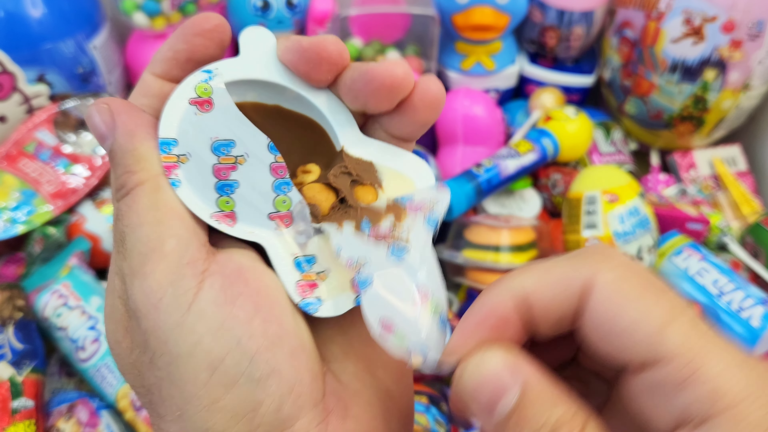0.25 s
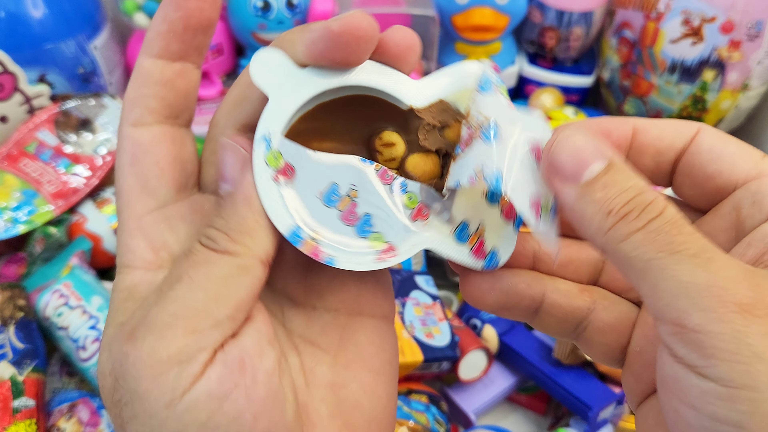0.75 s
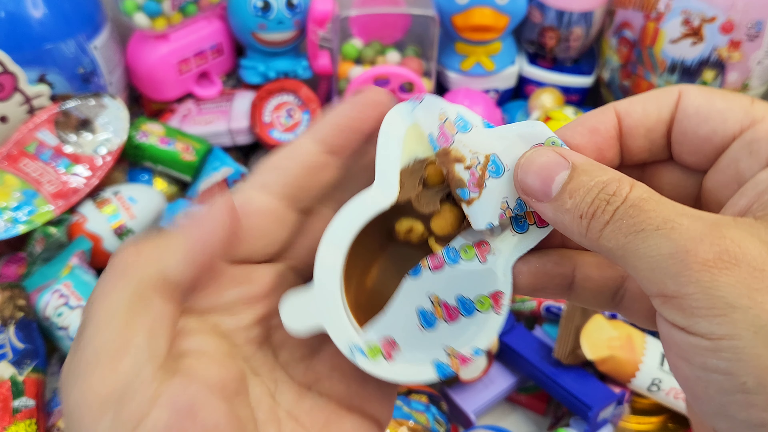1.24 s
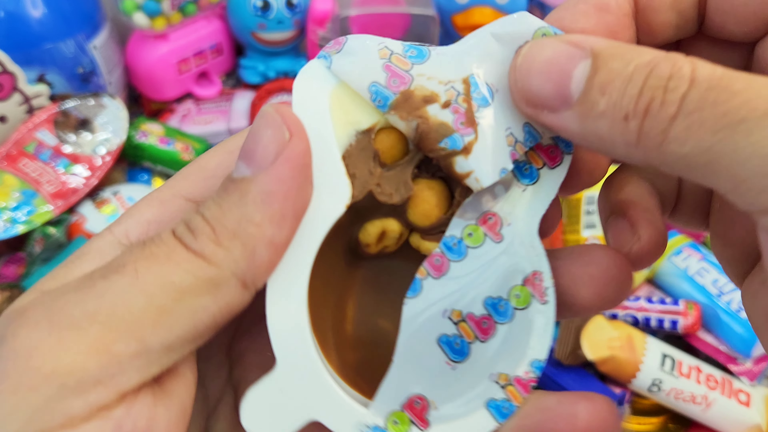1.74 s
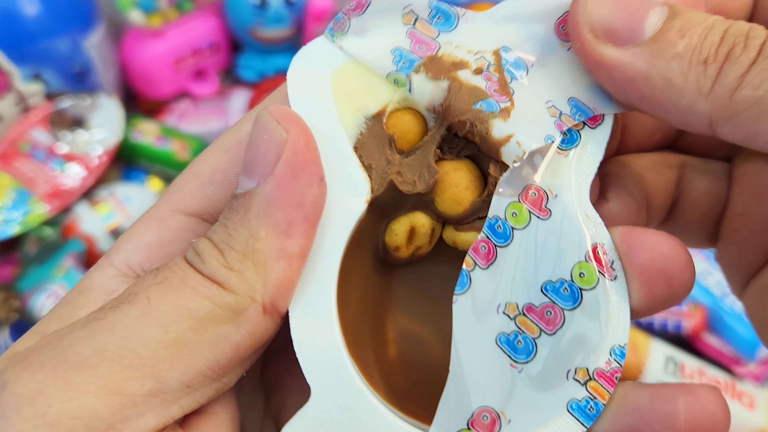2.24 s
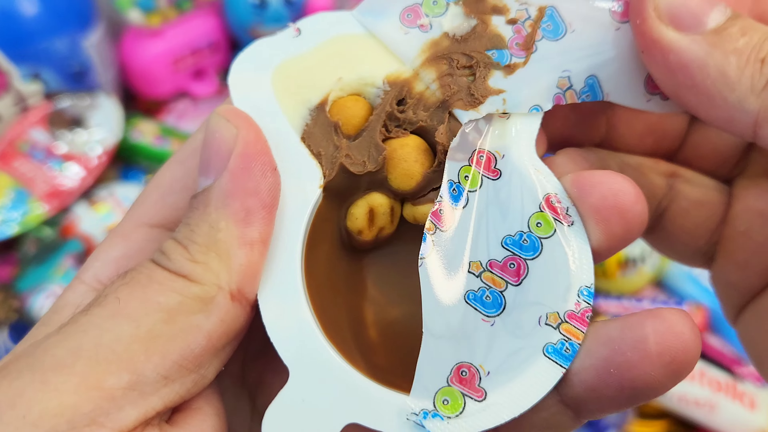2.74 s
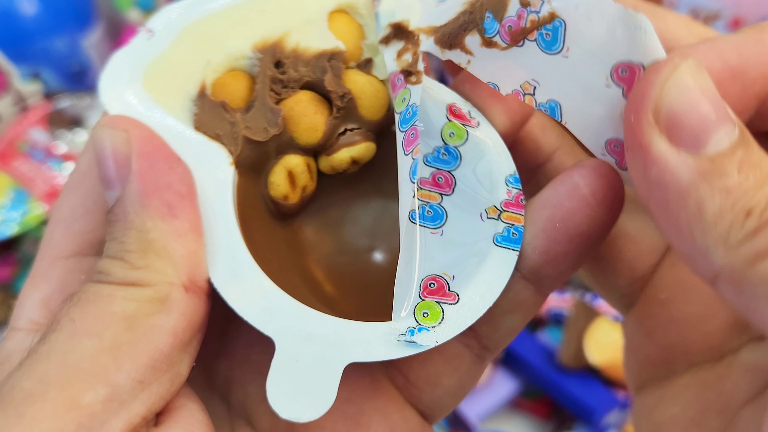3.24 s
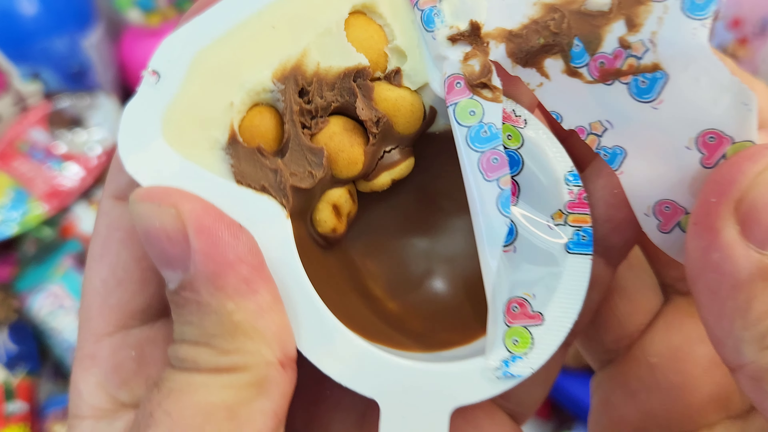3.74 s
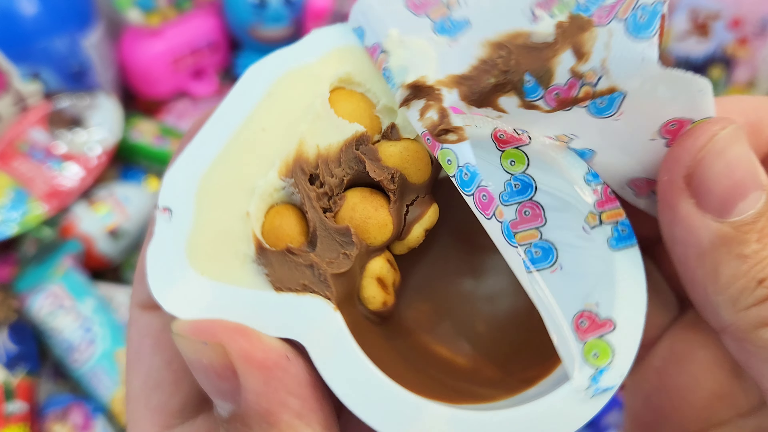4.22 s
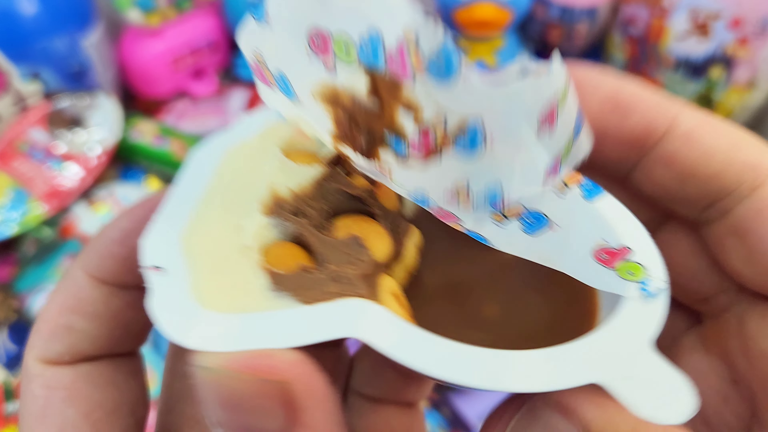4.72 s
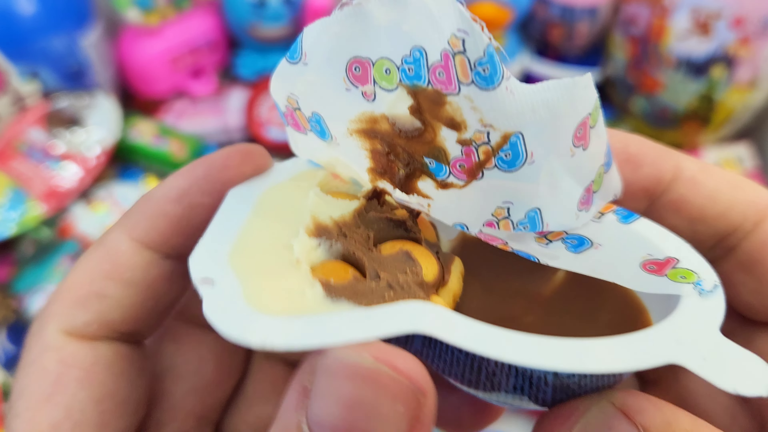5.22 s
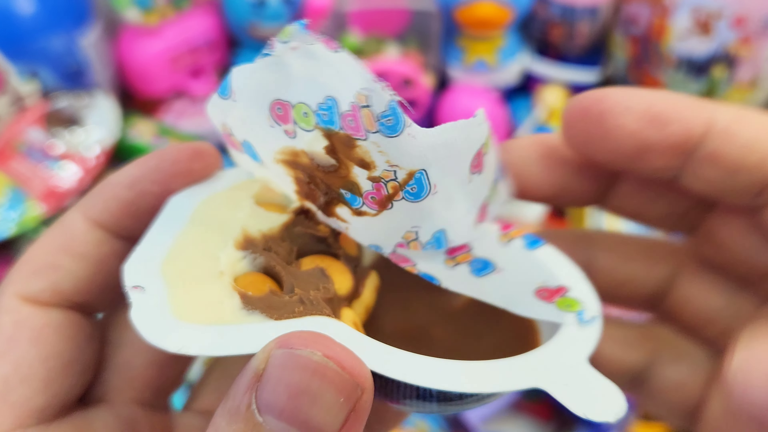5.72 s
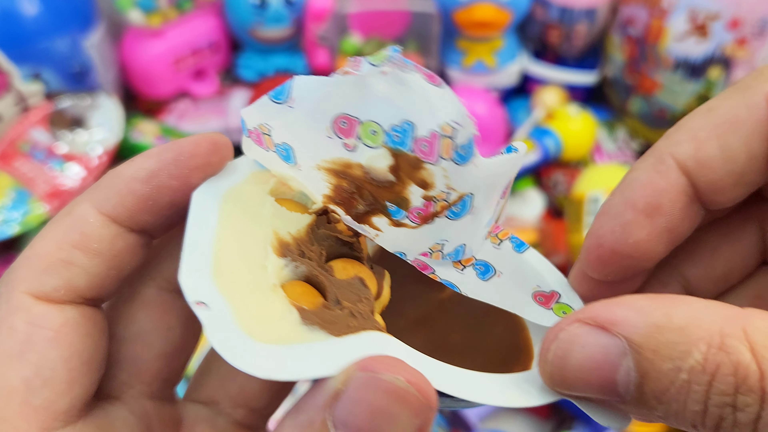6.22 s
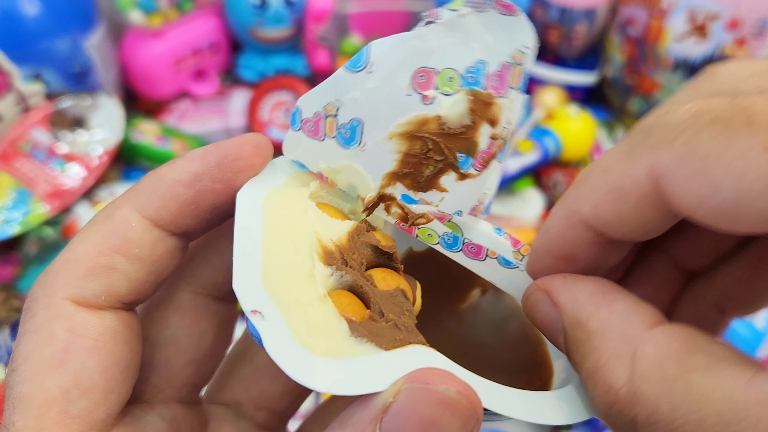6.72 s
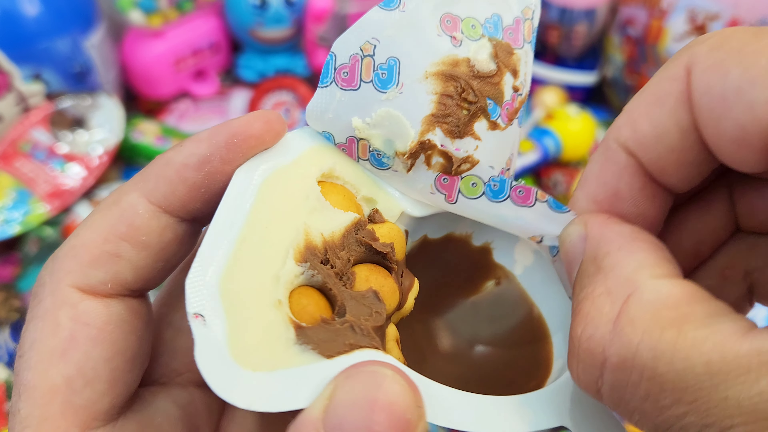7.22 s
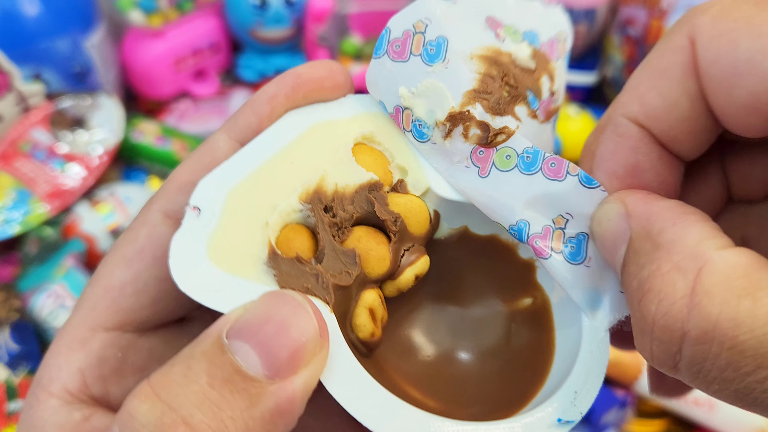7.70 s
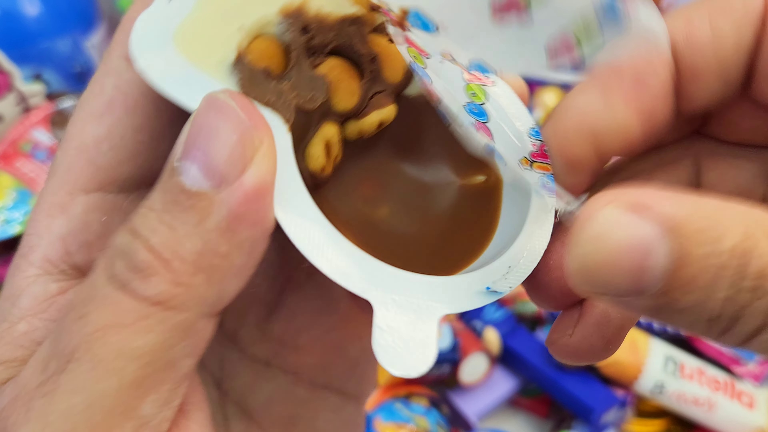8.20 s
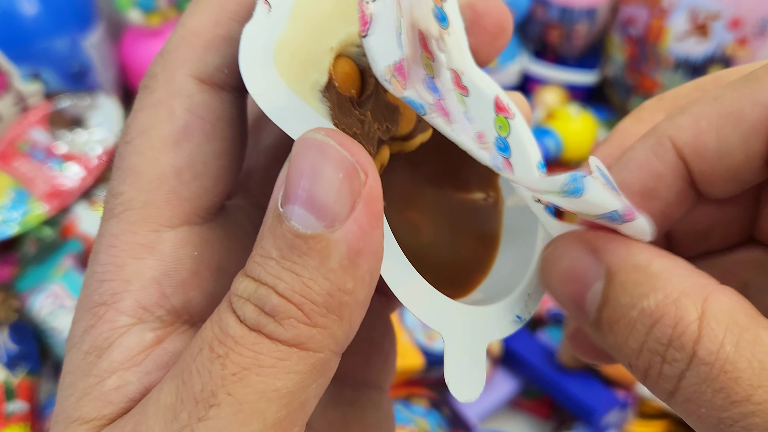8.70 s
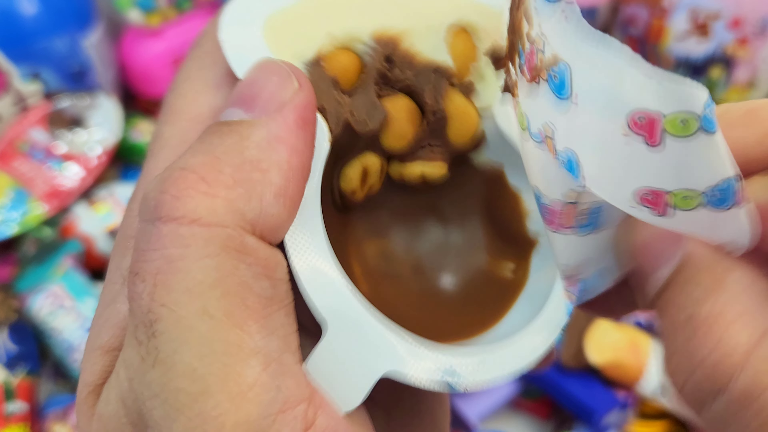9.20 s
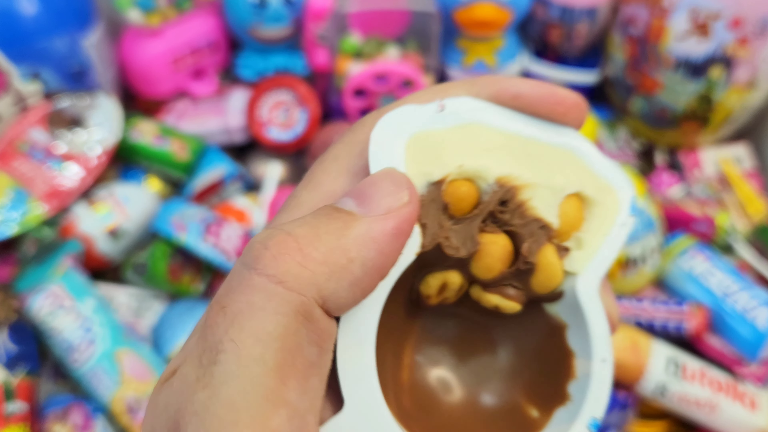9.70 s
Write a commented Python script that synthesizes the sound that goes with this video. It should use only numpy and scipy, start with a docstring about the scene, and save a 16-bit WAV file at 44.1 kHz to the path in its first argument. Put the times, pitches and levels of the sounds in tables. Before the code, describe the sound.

Bright foil crackles and pops as a lid is torn from a little plastic cup, with quiet pauses, faint rustling and distant soft thuds.

```python
"""Close stereo pair in a small hard room: hands peel and crinkle a foil lid off a small plastic cup, 9.95 s.
It opens on a tight run of snaps: noise cracks, sagging sine rings of the freed patch and damped cup thumps.
Hiss, rumble, far thuds on two low resonances and a hum, all shaped noise, lie beneath; creases rustle.
From 0.2 s come a few finger taps (falling sines), from 0.6 s short slides of skin on foil (noise).
The peeling thickens at 2.1 to 3.1 s, thins out, then is strong near 7.4 s and 9.4 s before it dwindles."""
import sys
import numpy as np
from scipy import signal
from scipy.fft import rfft, irfft
from scipy.io import wavfile
from scipy.ndimage import uniform_filter1d

SR = 44100
rng = np.random.default_rng(int(sys.argv[2]) if len(sys.argv) > 2 else 0)


def output_pcm(signal):
    """Save a mono or channel-first signal as 16-bit PCM at the path in sys.argv[1].

    Samples are clipped to [-1, 1] before scaling.
    """
    pcm = np.clip(np.atleast_2d(signal).T, -1, 1) * 32767
    wavfile.write(sys.argv[1], SR, np.round(pcm).astype(np.int16))


N = 438794
TIME_S = np.arange(N) / SR

# Room tone, spectrum: pitch_hz, relative level_db
HISS_SPECTRUM = [(15, -51.5), (25, -13.5), (64, -11), (145, -15), (277, -21.5), (911, -30), (3520, -37.5),
                 (6920, -49), (16000, -58.5)]
HISS_DB = -66
# Likeness of the hiss at the two microphones: pitch_hz, likeness (0 to 1)
HISS_LIKENESS = [(60, 0.65), (400, 0.31), (3000, 0.57)]

# The two lowest room resonances: pitch_hz, width_hz
ROOM_MODES = [(72, 35), (142, 17)]
# Far thuds: start_s, lower_resonance_db, upper_resonance_db, knock_db
THUDS = [(.23, -52, -62, -77), (0.878, -57, -57, -56), (1.1, -59, -65, -79), (1.97, -59, -50, -55.5),
         (2.31, -56.5, -64.5, -70.5), (2.61, -47, -51.5, -37.5), (2.789, -45, -50, -63),
         (2.93, -58.5, -49, -61.5), (3.83, -62, -76.5, -88), (3.96, -70, -76, -93), (4.339, -59, -68, -76),
         (4.544, -57, -42.5, -60), (4.859, -78, -87, -87), (5.138, -63, -51.5, -73),
         (5.359, -67.5, -56, -77.5), (5.758, -41, -38.5, -49.5), (6.019, -45.5, -46.5, -78.5),
         (6.3, -64, -53, -68.5), (6.568, -48, -48, -60.5), (6.798, -49.5, -40, -50.5),
         (7.3, -59.5, -57.5, -55), (7.47, -65, -68, -67), (8.05, -69, -56, -65.5),
         (8.33, -68.5, -57.5, -62.5), (9.19, -53, -71, -79), (9.549, -51.5, -49.5, -35.5)]
# Rumble between the thuds, level_db of: lower resonance, upper resonance, knock
IDLE_RUMBLE_DB = [-64, -68.5, -78.5]
THUD_RISE_S, THUD_FALL_DB_PER_S = 0.045, 113
KNOCK_LEAD_S, KNOCK_FALL_DB_PER_S = 0.025, 198.5  # the knock precedes the room's ring and dies sooner

# A faint far hum that comes and goes: time_s, level_db
HUM_LEVEL = [(0, -85), (4.7, -83.5), (5.3, -73.5), (5.9, -82.5), (7.3, -78), (8.2, -65.5), (8.9, -81.5),
             (9.95, -76)]
HUM_HZ, HUM_WIDTH_HZ = 414, 30

# Buckles of the lid: time_s, nominal patch_pitch_hz, ring_db, crack_centre_hz, crack_db, thump_db
SNAPS = [(0.0059, 3330, -29, 8500, -7, -42.5), (0.0249, 2200, -21.5, 10280, -10, -42.5),
         (0.033, 2038, -8.5, 4010, -10.0, -42), (0.0468, 1830, -19.5, 9640, -2.5, -37.5),
         (0.0614, 1930, -34, 10160, -26, -47.5), (0.08, 3540, -21, 9710, -8, -39.5),
         (0.0924, 3120, -19, 9630, -18.5, -48.5), (0.0991, 2340, -15, 4700, -17, -34),
         (0.229, 856, -34.5, 4050, -43, -35), (0.3823, 3454, -31.5, 4040, -37.5, -68.0),
         (0.4084, 1730, -29.5, 4630, -33, -47), (0.4167, 1880.0, -47.0, 4400, -39, -67.0),
         (0.5572, 2070, -29.5, 10400, -30, -74), (0.5964, 2350, -39, 10300, -34, -64),
         (0.672, 2440, -44.0, 3970, -41, -73), (0.6806, 3650, -42, 3980, -50, -73),
         (0.7325, 3560, -31, 4500, -27.5, -67.0), (0.7424, 3440, -52, 4700.0, -41, -68.0),
         (0.826, 3356, -39, 4800.0, -45, -67.0), (1.0716, 3100, -37, 5000.0, -54.5, -66.0),
         (1.092, 2400.0, -55, 4950, -50.0, -66.0), (1.162, 2420.0, -39.5, 9460, -48, -62),
         (1.6248, 3093, -39, 5030, -39, -70.0), (1.656, 1400.0, -45, 9200, -26.0, -66),
         (1.6857, 960, -46.5, 10200.0, -24.0, -51.0), (1.788, 1526, -28, 5000.0, -21.5, -33.5),
         (1.88, 1500, -40.5, 5450, -30, -54.5), (1.9825, 760.0, -63.5, 10020, -39.0, -55),
         (2.042, 1120.0, -70.5, 9850, -50.5, -59.5), (2.1032, 2840, -18, 11840, -14.5, -34),
         (2.158, 2790, -35.5, 5150, -24, -59.5), (2.227, 2157, -18, 5190, -11.5, -35),
         (2.2939, 3700, -26.0, 4920, -13.0, -37.5), (2.3067, 736, -41.5, 11610, -17.5, -40.5),
         (2.3167, 847, -12.5, 11900, -1.5, -19), (2.3356, 1126, -23, 8800, -10, -24),
         (2.3461, 1080.0, -25, 5180, -15, -28), (2.3768, 930, -33.5, 9700, -18.0, -46.5),
         (2.533, 3110, -40.5, 10470, -25, -62.5), (2.5838, 3270, -33, 10170, -21, -62.0),
         (2.596, 3750, -39, 10460, -28, -42), (2.616, 685, -21.5, 9490, -16, -17.5),
         (2.625, 3300, -15, 9670, -8, -22), (2.6289, 2086, -12, 9660, -19, -23.5),
         (2.6334, 3920, -3.5, 9600.0, -13, -22), (2.6373, 1126, -20.5, 9610, -4, -22),
         (2.6422, 970, -17.5, 4630, -9, -26), (2.6568, 1545, -22.5, 4260, -15, -38),
         (2.699, 1530, -25.5, 9970, -17, -54), (2.757, 3743, -10.5, 10250, -9.0, -47.0),
         (2.7891, 3500, -27, 5850, -14, -38.5), (2.8, 3800, -18.5, 4200.0, -25.5, -33),
         (2.8059, 1190, -27.0, 7620, -20.5, -40.5), (2.8195, 2740, -21.5, 11660, -20.0, -52),
         (2.827, 813, -30.5, 7690, -25, -46.5), (2.838, 3480, -21.5, 4344, -29, -62),
         (2.862, 3170.0, -23.5, 4300.0, -28, -57.5), (2.8786, 3180, -32, 4370, -25.5, -47.5),
         (2.8868, 3330, -29, 5080, -16, -42), (2.8913, 3480, -25.5, 5100.0, -21, -44.5),
         (2.9202, 1540, -35.5, 12950, -17.5, -39.5), (2.933, 3170, -36.5, 11200, -23.5, -33.5),
         (2.9573, 3420, -35.5, 12150, -28.5, -39), (2.9664, 3600, -17, 11900, -14.5, -25.5),
         (2.986, 870, -23.5, 5360, -24, -22.5), (3.0037, 961, -16, 11240, -15.0, -24.5),
         (3.0177, 987, -12.0, 11660, -11.5, -31), (3.026, 2350, -6, 11000.0, -10, -27.5),
         (3.0351, 1056, -11, 11000.0, -6.5, -35.5), (3.053, 1030, -13, 11400, -7, -33.0),
         (3.064, 970, -33, 11200, -12, -44), (3.1992, 2100, -25, 4600.0, -39.0, -50),
         (3.2043, 865, -31, 4000.0, -28.0, -38), (3.2097, 1970, -26.0, 11100.0, -31, -40),
         (3.2187, 2540, -20, 4000.0, -32, -44), (3.231, 3020, -18.5, 11000, -19, -49),
         (3.2559, 2530, -30, 4200, -31, -41), (3.2815, 2474, -28.5, 8200.0, -26.5, -52),
         (3.4734, 3910, -28, 4010, -25.5, -35), (3.9459, 2780, -51, 5200.0, -44.5, -65.5),
         (3.9756, 980.0, -27.5, 4020, -27.5, -40), (4.0635, 2260, -40, 4400.0, -48, -39),
         (4.1622, 2422, -16, 4000.0, -44, -38), (4.1947, 2130, -48, 9800, -37.5, -64),
         (4.2642, 1710, -36, 12900.0, -27, -40), (4.2788, 2617, -32.5, 4000.0, -45, -39),
         (4.2854, 2110.0, -36, 12700, -42, -37), (4.3528, 796, -49, 4000.0, -63.0, -42.5),
         (4.4371, 3245, -36.0, 4000.0, -58, -53), (4.5115, 3460, -51, 4000, -58, -71.5),
         (4.526, 3400, -33, 4020, -48, -66.5), (4.5357, 3400, -43, 4000.0, -31, -67.0),
         (4.5413, 3470, -33, 4040, -35, -52), (4.5483, 3140, -31, 4020, -39, -50),
         (4.579, 3130, -39, 3970, -41, -60), (4.5844, 3570, -38.5, 3940, -46, -60),
         (4.756, 2740, -42.5, 5340, -37, -67.0), (4.8153, 2940, -54, 9450, -41, -68.5),
         (4.9211, 2030, -52.5, 11700.0, -39, -69), (4.9871, 2408, -36, 9200, -31.5, -66.5),
         (5.0536, 2855, -48, 4800.0, -60, -71), (5.265, 2165, -52, 6200.0, -44.5, -69),
         (5.532, 2534, -37.5, 6200, -36.5, -56), (5.7656, 2180, -44, 5440, -34.5, -43.5),
         (5.7719, 2575, -39, 9940, -35, -38), (6.5742, 1710.0, -44.5, 5300.0, -62.5, -57),
         (6.5811, 1650.0, -38.0, 7570, -39.5, -34.5), (6.597, 1510.0, -36, 4800.0, -41.5, -47.5),
         (6.7001, 1732, -20.5, 4240, -27, -51), (6.763, 1664, -34.5, 4030, -55.5, -47.5),
         (6.8157, 1666, -24, 9920, -29.5, -60.5), (6.874, 1782, -4, 6030, -8.5, -40.5),
         (6.9554, 2100, -29, 11450, -28, -53.5), (6.9664, 1730, -26.5, 6700.0, -39.5, -49),
         (6.982, 1820, -26.5, 10300, -16.5, -61), (7.0286, 1870, -39, 11180, -38.5, -66),
         (7.1134, 2040, -57, 9580, -39.5, -74), (7.1288, 2000, -43.5, 11000, -21.5, -72.5),
         (7.154, 1950, -44, 9560, -38, -68), (7.2045, 2050, -35.5, 11470, -23.5, -58.5),
         (7.2406, 1730, -54, 9600.0, -33, -66.5), (7.261, 2460, -32.5, 10240, -20, -67),
         (7.2753, 1790.0, -34, 10040, -17.5, -71), (7.2976, 2420, -33, 9730, -15.5, -48),
         (7.3024, 2500, -27.5, 6080, -11.5, -48), (7.3069, 1672, -6, 5900.0, 1, -25),
         (7.3106, 1920, -15.5, 5700.0, -8.5, -22), (7.3138, 1783, -4.5, 9800.0, 0.5, -17),
         (7.4025, 2090, -20.5, 7620, -25, -44.5), (7.4318, 3085, -10.5, 5480, -13.5, -46.0),
         (7.449, 2200, -19.5, 10400.0, -24.0, -65), (7.4715, 2414, -0.5, 4100, -10.5, -25.5),
         (7.4878, 2080.0, 2.5, 4100.0, 5, -31), (7.5038, 2210, -24, 4000, -31, -48.5),
         (7.5503, 2210, -24, 4000, -28.5, -58), (7.6506, 3000, -23, 4900.0, -19, -52),
         (7.7502, 2373, -13.5, 5500.0, -23, -37), (7.773, 2390, -20.0, 4600.0, -28.0, -31),
         (7.9057, 2370, -30.5, 4700, -31.5, -63), (7.9428, 1130.0, -48, 10700.0, -40.0, -64),
         (8.0076, 3500, -10, 4630, -6, -71), (8.0385, 958, -28.5, 5100, -34, -55),
         (8.0612, 1670, -41, 4900, -28, -53), (8.071, 1550, -25.5, 6300, -30, -39),
         (8.0864, 1530, -38, 4000, -39, -52), (8.1086, 1550, -29, 4000.0, -50, -37),
         (8.1405, 3370, -48, 11600, -30, -56), (8.2098, 2150, -28, 9200, -35, -56),
         (8.3515, 2400, -28.5, 4700.0, -48.5, -55), (8.6495, 2007, -37, 6100.0, -63, -50),
         (8.655, 2350, -36, 5780, -52, -67.5), (8.7362, 1637, -45.0, 8660, -58, -72.0),
         (8.748, 1940, -45.0, 6270, -57, -74.5), (8.7835, 2360, -22, 4700.0, -22, -57),
         (8.8874, 2584, -23, 4700.0, -16, -49), (8.9047, 2500, -26, 9800.0, -19, -57),
         (8.9155, 2575, -25, 9900.0, -20.5, -55), (8.9932, 2140, -38, 4400.0, -49, -64.0),
         (9.0605, 2415, -35, 5700.0, -28.5, -72), (9.107, 2262, -14.5, 9300.0, -9.5, -44),
         (9.131, 3870, -37.0, 8900.0, -25, -67.0), (9.137, 2410, -23, 9300.0, -12.5, -69.0),
         (9.1953, 2390, -20, 9350, -4.5, -45), (9.2023, 2310, -10.5, 5100.0, -21, -36),
         (9.2144, 1010, -21.5, 5600, -15, -45), (9.2277, 2220, -24.5, 5400, -22, -37),
         (9.2372, 1150, -21.5, 5200.0, -9.5, -43), (9.2495, 2360, -32, 5600.0, -14, -48.0),
         (9.2632, 3447, -9, 12200.0, -5.5, -52), (9.2796, 2230.0, -37, 5700.0, -12.5, -51.0),
         (9.2868, 3670, -36.5, 5500.0, -12, -58), (9.3145, 2640, -43, 5400, -18, -60),
         (9.3645, 2475, -22, 5800.0, -13.5, -63), (9.4076, 2430.0, -29.5, 11500.0, -21.5, -54),
         (9.4495, 2460, -29, 5500, -31, -63), (9.4746, 2520, -9, 5100.0, -2, -53),
         (9.4845, 2510, -6.5, 5400.0, -10, -37), (9.489, 2420.0, -14, 5300.0, -3.5, -47),
         (9.4971, 2590, -2, 12000, 4.5, -40), (9.5092, 1065, -21, 6000.0, -4.5, -37),
         (9.5126, 852, -13, 5400.0, -4.5, -32), (9.5226, 2410, -17, 12200, -2, -40),
         (9.5489, 1730, -28, 4320, -20, -27), (9.5631, 2280, -26, 5056, -21, -27),
         (9.5931, 2295, -11.5, 12100, -14, -17), (9.6261, 3470, -14, 7900.0, -14, -35),
         (9.7618, 925, -30, 4480, -30, -51.0), (9.9131, 2810.0, -46.0, 4050, -57, -61.0),
         (9.9304, 3850, -38.5, 4600.0, -29.5, -44.5)]
# Thump modes of the cup: pitch_hz, width_hz, relative level_db
CUP_MODES = [(264, 75, -15.5), (398, 82, -5), (700, 360, 1)]
# Colour of the foil: pitch_hz, level_db
FOIL_COLOUR = [(2500, -11.5), (4500, 5), (6000, 3.5), (8000, 0.5), (10000, 5.5), (13000, 1.5), (15000, -2)]
SNAP_SAMPLES, SNAP_PEAK_S = 1024, 0.005
# Where the lid is held between the microphones: time_s, left_over_right_db
LID_PLACE = [(0, 0), (2, -0.5), (4, 0.5), (6.5, 2.5), (7.4, -3), (9, -2), (9.95, -5)]
STRAY_DB, STRAY_SAMPLES = 4, 3  # spread of the snaps' level balance and right-channel shift

# Pulls at the lid, each a burst of tiny creases:
# start_s, hold_s, level_db, dullness_db (low creases over high ones)
PULLS = [(-.03, 0.043, -33, 1), (0.022, 0.064, -27.5, -4.5), (0.554, 0.35, -76.5, 7.5),
         (1.605, 0.2, -66, -10), (2.104, 0.37, -54, -29), (2.588, 0.029, -33.5, -7.5),
         (2.786, 0.13, -40, -5.5), (2.942, 0.11, -30.5, -4), (3.175, 0.054, -45.5, -1.5),
         (3.954, 0.55, -83, 8), (4.404, 0.15, -60, -11), (6.58, 0.54, -78, 7), (6.88, 0.065, -48.5, -4),
         (7.085, .2, -62.5, -22), (7.288, 0.014, -36.5, 5), (7.466, 0.096, -40.5, -8),
         (8.033, 0.11, -58, 2.5), (8.16, 0.049, -55.5, 2.5), (8.286, 0.048, -52, 2), (8.708, 0.079, -69, 0),
         (8.881, 0.0083, -46, 3.5), (9.183, 0.062, -34, -6.5), (9.462, 0.13, -32, -6),
         (9.826, 0.15, -66, 0)]
PULL_RISE_S, PULL_FALL_DB_PER_S, IDLE_RUSTLE_DB = 0.007, 303, -82.5

# The hollow under the lifted lid: time_s, pitch_hz, strength_db
HOLLOW = [(0, 2216, -17.5), (3.5, 2337, -15), (4.2, 2350, -12), (6.3, 2067, 5), (6.75, 1795, -6),
          (6.95, 2033, 2.5), (7.7, 2300, -17), (8.9, 2260, -5.5), (9.95, 2370, -14)]
HOLLOW_WIDTH_HZ = 750  # of the main resonance; the lower one narrows with its pitch
LOWER_HOLLOW_SHARE, LOWER_HOLLOW_DB = 0.36, -6.5  # share of the main pitch, relative strength
HOLLOW_ROOM_DB = 6.5  # the hollow faces the room more than the microphones

# Decay of the room: pitch_hz, time_to_fall_60_db_s
ROOM_T60 = [(250, .45), (800, .32), (2000, .36), (5500, .34), (10000, .33), (15000, .31)]
# Colour of the room's answer: pitch_hz, level_db
ROOM_COLOUR = [(300, -1.5), (1000, -0.5), (2200, 0), (3300, 1.5), (4800, 0), (8000, 2.5), (14000, -2)]
ROOM_DB = -9.5

# A finger taps the cup: start_s, level_db
TAPS = [(.229, -45), (3.973, -44.5), (4.351, -39.5)]
TAP_HZ, TAP_DROP_HZ, TAP_DROP_S, TAP_FADE_S = 110.4, 506, 0.0015, 0.013

# Fingers slide briefly over the foil: centre_s, half_length_s, level_db, scrape_over_fine_db
SLIDES = [(0.602, 0.015, -47.5, -5), (1.083, 0.015, -63, 13), (1.16, 0.0049, -49.5, 0),
          (3.462, 0.017, -41.5, 1), (4.066, 0.0086, -47.5, 8), (4.436, 0.018, -62, 7),
          (4.76, 0.0076, -57.5, 1.5), (5.125, 0.018, -67.5, 0), (5.63, 0.0084, -58.5, 5.5),
          (6.375, 0.011, -79, 17.5), (6.486, 0.012, -85, 16), (6.595, 0.0052, -57.5, 1.5),
          (6.808, 0.011, -47, -2.5), (8.221, 0.043, -50.5, 0.5), (8.3, 0.018, -55.5, 1.5),
          (8.511, 0.0073, -64, 8.5), (8.639, 0.0058, -72, 7), (9.865, 0.0086, -51.5, -12)]

# Balance of the microphones: pitch_hz, left_over_right_db
MIC_BALANCE = [(100, 7), (1000, 4), (2500, 5), (5000, -2.5), (9000, 3.5), (14000, 2.5)]
RIGHT_LAG_S = 0.00013
EDGE_HZ = 16150  # upper band limit


def gain_of(db):
    """Decibels to amplitude."""
    return 10 ** (np.asarray(db) / 20)


def evened(x):
    """Scales to rms 1."""
    return x / np.sqrt(np.mean(x ** 2) + 1e-20)


def peaked(x):
    """Scales each row to peak 1."""
    return x / abs(x).max(-1, keepdims=True)


def read(points, hz):
    """Reads a spectrum on a log-frequency axis."""
    f, value = np.transpose(points)
    return np.interp(np.log(hz + 1), np.log(f + 1), value)


def log_bell(hz, centre_hz, width):
    """A bell on a log-frequency axis; width in natural-log units."""
    return np.exp(-(np.log((hz + 1) / centre_hz) / width) ** 2)


def curves(rows):
    """Columns of a curve table at every sample."""
    s, *columns = np.transpose(rows)
    return [np.interp(TIME_S, s, column) for column in columns]


def colour(x, gain):
    """Filters the last axis by gain(Hz)."""
    return irfft(rfft(x) * gain(np.fft.rfftfreq(x.shape[-1], 1 / SR)), x.shape[-1])


def resonate(x, hz, width_hz):
    """One resonance that passes no steady pressure."""
    r = np.exp(-np.pi * width_hz / SR)
    return signal.lfilter([1, -1], [1, -2 * r * np.cos(2 * np.pi * hz / SR), r * r], x)


def swell(start_s, hold_s, rise_s, fall_db_per_s):
    """Envelope: smooth rise, hold, then a steady fall in dB."""
    t = TIME_S - start_s
    rise = np.sin(np.pi / 2 * np.clip(t / rise_s, 0, 1)) ** 2
    return rise * gain_of(-fall_db_per_s * np.maximum(t - rise_s - hold_s, 0))


def hiss():
    """Steady room tone: shaped noise, partly shared by the two microphones."""
    left, other = rng.standard_normal((2, N))
    likeness = lambda hz: np.clip(read(HISS_LIKENESS, hz), 0, 1)
    right = colour(left, likeness) + colour(other, lambda hz: np.sqrt(1 - likeness(hz) ** 2))
    shaped = colour(np.array([left, right]), lambda hz: gain_of(read(HISS_SPECTRUM, hz)))
    return gain_of(HISS_DB) * evened(shaped)


def rumble():
    """Low noise and far thuds ring two room resonances, nearly alike in both microphones."""
    level = gain_of(IDLE_RUMBLE_DB)[:, None]
    for s, *db in THUDS:
        ring = swell(s, 0, THUD_RISE_S, THUD_FALL_DB_PER_S)
        knock = swell(s - KNOCK_LEAD_S, 0, THUD_RISE_S, KNOCK_FALL_DB_PER_S)
        level = level + gain_of(db)[:, None] * np.array([ring, ring, knock])
    noise = rng.standard_normal((3, 3, N))
    noise = noise[:, :1] + 0.34 * noise[:, 1:]  # shared part plus each microphone's own
    lower, upper = (evened(resonate(resonate(n, hz, 2 * width), hz, width))
                    for n, (hz, width) in zip(noise, ROOM_MODES))
    knock = evened(colour(noise[2], lambda hz: log_bell(hz, 330, 0.51)))
    return level[0] * lower + level[1] * upper + level[2] * knock


def hum():
    """Noise through two equal narrow resonances in series gives a wavering hum."""
    noise = rng.standard_normal((3, N))
    stereo = noise[0] + 0.5 * noise[1:]
    band = resonate(resonate(stereo, HUM_HZ, HUM_WIDTH_HZ), HUM_HZ, HUM_WIDTH_HZ)
    return gain_of(curves(HUM_LEVEL)[0]) * evened(band)


def burst(noise, envelope, gain):
    """A short puff of noise whose broad spectrum is evened out to gain(Hz)."""
    z = rfft(noise * envelope)
    broad = np.sqrt(uniform_filter1d(abs(z) ** 2, size=9, axis=-1))
    return irfft(z / broad * gain(np.fft.rfftfreq(noise.shape[-1], 1 / SR)))


def snap_sounds(ring_hz, ring_db, crack_hz, crack_db, thump_db):
    """One row a snap: foil lets go with a crack, its freed patch rings and the cup thumps."""
    t = np.arange(SNAP_SAMPLES) / SR
    noise = rng.standard_normal((len(ring_hz), 2, SNAP_SAMPLES))
    chance = rng.random((len(ring_hz), 2, 1))
    after = np.maximum(t - SNAP_PEAK_S, 0)
    before = np.maximum(SNAP_PEAK_S - t, 0)
    # faint soft lead-in before the peak
    lead_in = np.sin(np.pi / 2 * (1 - before / SNAP_PEAK_S)) ** 2 * np.exp(-before / 0.003)
    rise = np.exp(-before / 0.00025) + 0.07 * lead_in

    tint = lambda hz: gain_of(read(FOIL_COLOUR, hz) + 5 * log_bell(hz, crack_hz, 0.22))
    crack_fade = np.exp(-after / 0.001) + 0.31 * np.exp(-after / 0.0033)
    crack = burst(noise[:, 0], rise * crack_fade, tint)

    # the patch slackens: its pitch sags from 1.27 to 0.85 of nominal
    turns = ring_hz * (0.85 * t + 0.0005 * (1 - np.exp(-after / 0.0012))) + chance[:, 0]
    # a large patch, more ring than crack, sounds longer
    cycles = 1.5 + 1.5 * chance[:, 1] + np.clip((ring_db - crack_db) / 3, 0, 3)
    ring_envelope = rise * np.exp(-after * ring_hz / cycles)
    # uneven tearing roughens the ring
    rough = burst(noise[:, 1], ring_envelope, lambda hz: log_bell(hz, np.sqrt(1800 * ring_hz), 1.006))
    ring = np.sin(2 * np.pi * turns) * ring_envelope + 1.36 * peaked(rough)

    thump = sum(gain_of(db) * np.sin(2 * np.pi * hz * after) * np.exp(-np.pi * width * after)
                for hz, width, db in CUP_MODES)
    return gain_of(ring_db) * peaked(ring) + gain_of(crack_db) * peaked(crack) + gain_of(thump_db) * peaked(thump)


def rustle(per_s=600, spread_db=4.0):
    """Many small creases at random, drawn from 16 high and 16 low shapes; a few are larger."""
    high_gain, low_gain = gain_of([[IDLE_RUSTLE_DB]] * 2) * np.ones(N)
    for s, hold, db, dull_db in PULLS:
        pull = swell(s, hold, PULL_RISE_S, PULL_FALL_DB_PER_S)
        high_gain = high_gain + gain_of(db) * pull
        low_gain = low_gain + gain_of(db + dull_db) * pull
    size = gain_of(spread_db * np.minimum(rng.exponential(1, N), 3.5))
    creases = size * (rng.random(N) < per_s / SR)
    pick = rng.integers(0, 16, N)
    u, v, w = rng.random((3, 16, 1))
    mute_db = -120
    high_shapes = snap_sounds(1000 + u, mute_db, 4500 + 9000 * u, 0, mute_db)  # cracks only
    low_shapes = snap_sounds(600 + 2600 * v, 0, 5000 + u, mute_db, -20.5)  # rings and thumps
    high, low = np.zeros((2, 2, N))
    for k in range(16):
        pan = gain_of(12 * (w[k] - 0.5) * np.array([[1], [-1]]))
        chosen = creases * (pick == k)
        high += pan * signal.oaconvolve(chosen, high_shapes[k])[:N]
        low += pan * signal.oaconvolve(chosen, low_shapes[k])[:N]
    return high_gain * evened(high) + low_gain * evened(low)


def snaps():
    """The distinct buckles of the lid, each from a slightly different spot."""
    s, *timbre = np.transpose(SNAPS)[:, :, None]
    sounds = snap_sounds(*timbre)
    out = np.zeros((2, N + 1100))
    stray = np.clip(rng.standard_normal((len(s), 2)), -2, 2)
    pan_db = np.interp(s[:, 0], *np.transpose(LID_PLACE)) + STRAY_DB * stray[:, 0]
    starts = ((s[:, 0] - 0.0053) * SR).astype(int)  # leaves room for the lead-in
    shifts = np.round(STRAY_SAMPLES * stray[:, 1]).astype(int)
    for at, shift, pan, sound in zip(starts, shifts, pan_db, sounds):
        out[0, at:at + SNAP_SAMPLES] += gain_of(pan / 2) * sound
        out[1, at + shift:at + shift + SNAP_SAMPLES] += gain_of(-pan / 2) * sound
    return out[:, :N]


def hollow(x, extra_db=0):
    """The air between lid and cup adds two resonances that move as the lid bends."""
    hz, db = curves(HOLLOW)
    out = x
    for share, mode_db in ((1, 0), (LOWER_HOLLOW_SHARE, LOWER_HOLLOW_DB)):
        # shift the moving pitch down to zero, low-pass, and shift back
        turn = np.exp(2j * np.pi * share * np.cumsum(hz) / SR)
        r = np.exp(-np.pi * share * HOLLOW_WIDTH_HZ / SR)
        smooth = signal.lfilter([(1 - r) ** 2], [1, -2 * r, r * r], x / turn)
        ring = 2 * (turn * smooth).real
        out = out + gain_of(db + mode_db + extra_db) * ring
    return out


def room(x):
    """The small hard room answers: sparse random reflections that die band by band."""
    reflections = np.zeros((2, SR // 2))
    at = np.arange(260, SR // 2 - 20, 20)
    at = at + rng.integers(0, 20, (2, len(at)))
    np.put_along_axis(reflections, at, rng.choice([-1., 1.], at.shape), 1)
    hz, t, z = signal.stft(reflections, SR, nperseg=256)
    decay = gain_of(-60 * t / read(ROOM_T60, hz)[:, None])
    tail = signal.istft(z * decay, SR, nperseg=256)[1]
    low = colour(tail, lambda hz: 1 / (1 + (hz / 600) ** 2))
    tail = tail - low + np.sqrt(2) * low.mean(0)  # the bass of the tail is shared
    tail = colour(tail, lambda hz: gain_of(read(ROOM_COLOUR, hz)))
    tail = gain_of(ROOM_DB) * tail / np.linalg.norm(tail[0])
    return signal.fftconvolve(x.mean(0)[None], tail, axes=1)[:, :N]


def taps():
    """A finger on the cup: a short dull decaying sine whose pitch drops at once."""
    start_s, level_db = np.transpose(TAPS)
    after = np.maximum(TIME_S - start_s[:, None], 0)
    turns = TAP_HZ * after + TAP_DROP_HZ * TAP_DROP_S * (1 - np.exp(-after / TAP_DROP_S))
    return gain_of(level_db) @ (np.sin(2 * np.pi * turns) * np.exp(-after / TAP_FADE_S))


def slides():
    """Skin rubs the foil: fine hiss, and a scrape coloured by the hollow of the cup."""
    flutter_db = 1.8 * evened(uniform_filter1d(rng.standard_normal(N), size=60))
    noise = rng.standard_normal((2, 3, N)) * gain_of(flutter_db)
    noise = noise[:, :1] + 1.9 * noise[:, 1:]  # shared part plus each microphone's own
    fine = evened(colour(noise[0], lambda hz: gain_of(read(FOIL_COLOUR, hz))))
    scrape = evened(colour(noise[1], lambda hz: log_bell(hz, 2300, 0.73)))
    out = np.zeros((2, N))
    for s, half, db, scrape_db in SLIDES:
        stroke = np.exp(-((TIME_S - s) / half) ** 2)
        out += gain_of(db) * stroke * (fine + gain_of(scrape_db) * scrape)
    return out


def scene():
    """The right microphone hears the foil later; long waves wrap round both alike."""
    lid = snaps() + rustle() + slides() + taps()
    low = colour(lid, lambda hz: 1 / (1 + (hz / 500) ** 2))
    lid = lid - low + low.mean(0)
    foil = hollow(lid)
    left = colour(foil[0], lambda hz: gain_of(read(MIC_BALANCE, hz) / 2))
    lag = lambda hz: np.exp(-2j * np.pi * hz * RIGHT_LAG_S)
    right = colour(foil[1], lambda hz: gain_of(-read(MIC_BALANCE, hz) / 2) * lag(hz))
    direct = np.array([left, right])
    return direct + room(hollow(lid, HOLLOW_ROOM_DB)) + rumble() + hum() + hiss()


def record(dry):
    """The microphones lose the deepest bass and clip at full scale; then the band limit."""
    heard = signal.lfilter(*signal.butter(2, 45, "high", fs=SR), dry)
    edge = signal.firwin(301, EDGE_HZ, window=("kaiser", 9), fs=SR)
    return signal.oaconvolve(np.clip(heard, -1, 1), edge[None], "same")


dry = scene()
out = record(dry)
output_pcm(out)
```